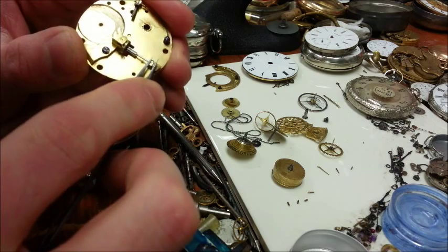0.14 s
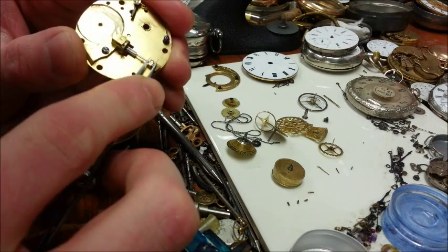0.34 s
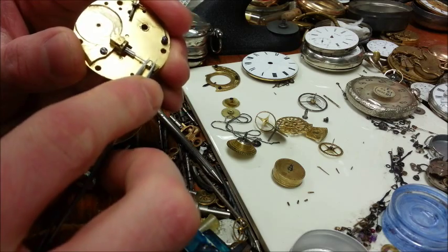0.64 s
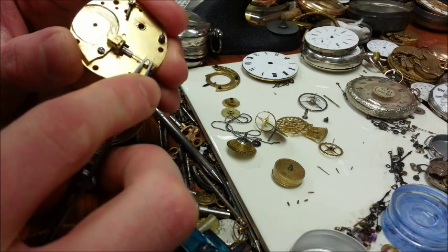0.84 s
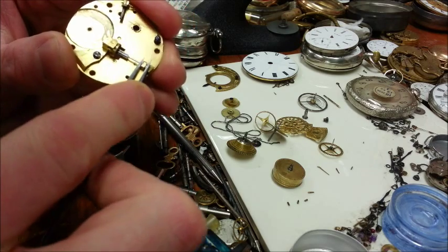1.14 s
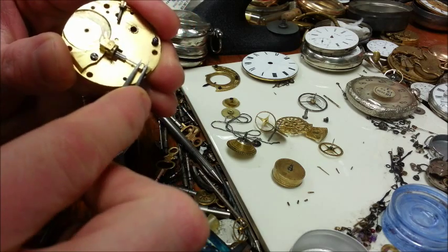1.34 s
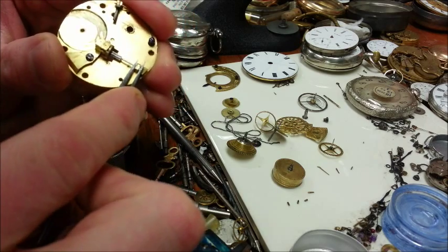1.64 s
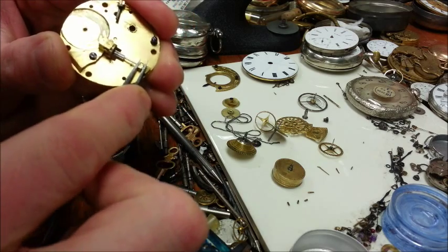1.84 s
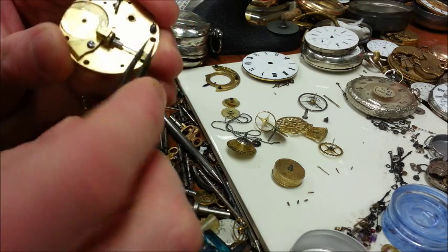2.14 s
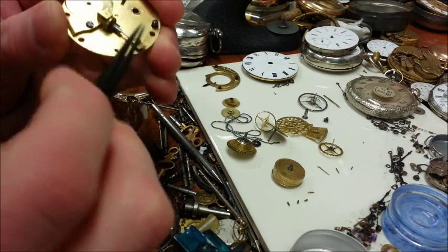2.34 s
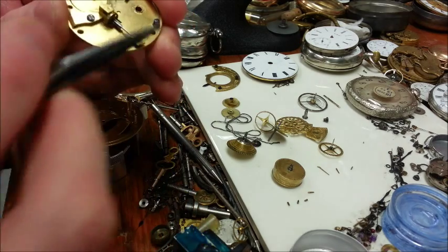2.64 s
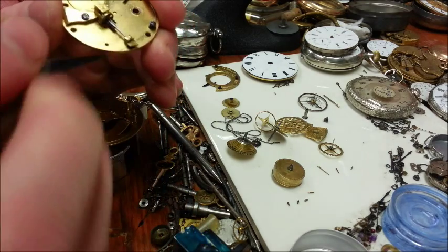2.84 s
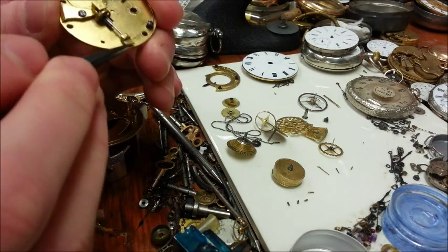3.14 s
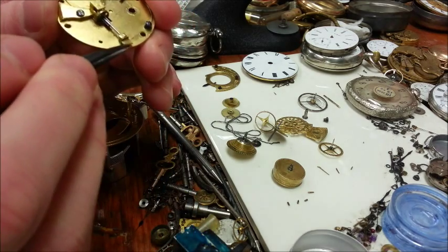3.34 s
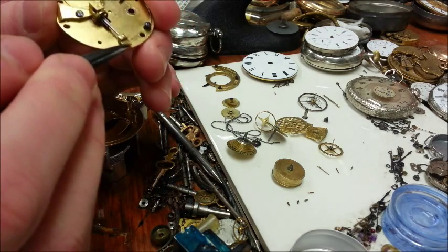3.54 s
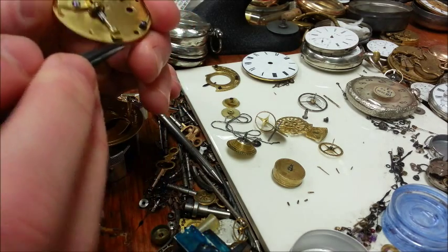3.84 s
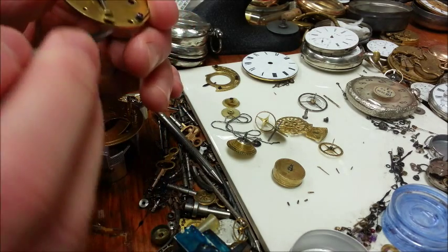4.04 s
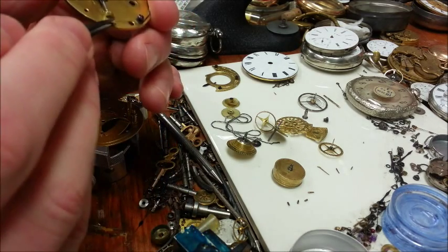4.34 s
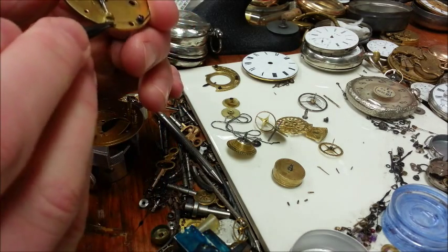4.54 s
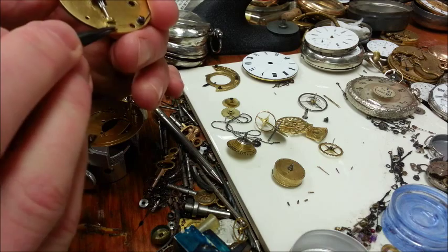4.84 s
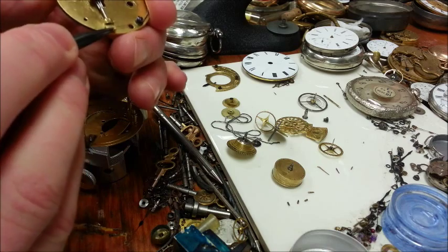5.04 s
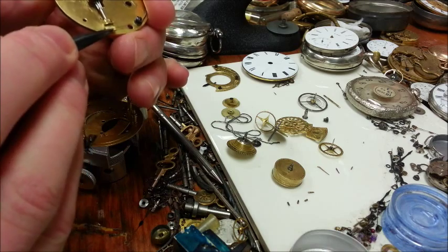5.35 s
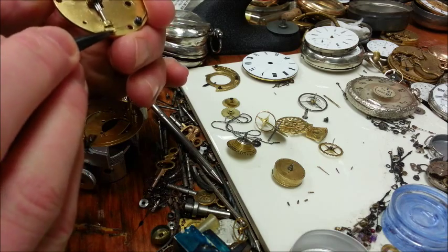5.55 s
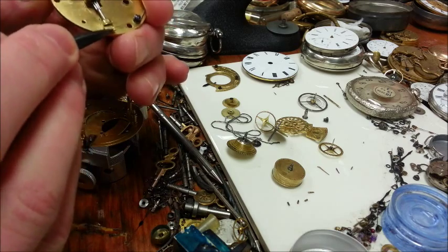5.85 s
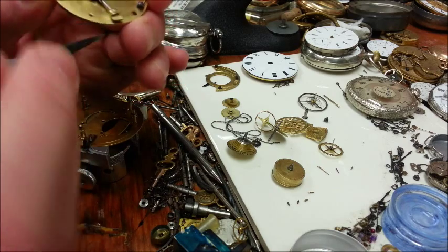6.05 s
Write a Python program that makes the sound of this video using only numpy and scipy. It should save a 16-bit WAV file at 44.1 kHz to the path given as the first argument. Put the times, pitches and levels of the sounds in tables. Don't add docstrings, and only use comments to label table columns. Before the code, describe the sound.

A quiet workbench in a small room, heard in close stereo with the handling mostly on the right. Throughout, ventilation rumbles low and slightly unsteady, a motor hums, a very thin high lamp whine and soft hiss sit beneath, and another watch ticks faintly five times a second, strong and weak beats alternating, one tick standing out near 2.2 s. At 0.47 s a dry double tap on brass with a soft rub. Around 2.15 s small springy nudges ring briefly, then skin brushes softly; bright pecks follow at 2.6 s and 2.86 s, more taps at 3.1 s. At 3.7 s a short gritty scrape catches and slips, with fainter scraping and a knock to 3.95 s. Taps and a hollow knock cluster at 4.1-4.45 s. After a pause, a loud, crisp, ringing snap cracks at 5.2 s, then a quieter, tighter snap at 6.06 s.

```python
import sys
import numpy as np
from scipy import signal
from scipy.fft import rfft, irfft
from scipy.io import wavfile
from scipy.ndimage import uniform_filter1d

SR = 44100
rng = np.random.default_rng(int(sys.argv[2]) if len(sys.argv) > 2 else 0)


def output_pcm(signal):
    pcm = np.clip(np.atleast_2d(signal).T, -1, 1) * 32767
    wavfile.write(sys.argv[1], SR, np.round(pcm).astype(np.int16))


def field_ratio(decibels):
    return 10 ** (np.asarray(decibels, dtype=float) / 20)


N = 272538


def on_log(table, hz):
    f, v = np.transpose(table)
    return np.interp(np.log(hz + 1), np.log(f + 1), v)


def walk(rate):
    size = int(SR / rate)
    x = uniform_filter1d(rng.standard_normal(N), size=size)
    x = uniform_filter1d(x, size=size)
    return x / x.std()


def contacts(rows, modes, grain_db=5, scatter_db=3, far_lag=10, least_shade=0.17, crack_db=-8,
             rise=0.35, blow=0, loose=1, stagger=.5, onset_s=0.000067):
    # pitch_hz, share [ratio]
    shade_table = [(1200, .45), (2600, .2), (3500, -.25), (4300, -.5), (5100, .5), (6100, .65), (7200, 2),
                   (10000, 1.3)]
    out = np.zeros((2, N + SR))
    t = np.arange(6144) / SR
    hz, mode_db, t60_s = np.transpose(modes)[:, :, None]
    bright = signal.butter(1, [1800, 13500], "band", fs=SR, output="sos")
    shade_hz = np.arange(len(t) + 1) * SR / len(t) / 2
    shade = np.maximum(on_log(shade_table, shade_hz), least_shade)
    for start_s, peak_db, contact_ms, pan_db, tilt_db in rows:
        impacts = rng.standard_normal(len(t)) * field_ratio(grain_db * rng.exponential(size=len(t)))
        u = t / (max(contact_ms, .05) / 1000)
        build = 1 - np.exp(-(u + 0.13) / abs(rise))
        impacts = impacts * build * np.exp(-.8 * u - u ** 6)
        impacts[0] += blow * np.linalg.norm(impacts)

        turn = loose * rng.random((2, len(hz), 1)) + np.arange(len(hz))[:, None] * stagger
        spread = rng.standard_normal((2, len(hz), 1))
        gain = field_ratio(mode_db + tilt_db * np.log2(hz / 6000) + scatter_db * spread)
        decay = np.exp(-np.log(1000) * t / t60_s)
        ring = np.sum(gain * decay * np.sin(2 * np.pi * (hz * t + turn)), axis=1)
        ring = ring * np.minimum(t / onset_s, 1)
        crack = signal.sosfilt(bright, 1. * (t == 0))
        sound = signal.fftconvolve(ring + field_ratio(crack_db) * crack, impacts[None], axes=1)[:, :len(t)]

        left = rfft(sound[0], 2 * len(t)) * field_ratio(pan_db * shade)
        sound[0] = irfft(left)[:len(t)]
        sound = sound * field_ratio(peak_db) * 2 / np.abs(sound).max(axis=1).sum()
        for side, lag in enumerate((far_lag, 0)):
            at = int(start_s * SR) + lag
            out[side, at:at + len(t)] += sound[side]
    return out[:, :N]


def snaps():
    # start_s, peak_db, contact_ms, left_minus_right_db, tilt_db_per_octave
    snap_rows = [
        (5.2155, -9, .3, -11.5, 0),
        (5.2162, -35, 14, -9, -4),
        (5.2428, -39, 1.5, -1, -6),
        (6.0638, -24, .4, -11, 0),
        (6.0745, -46, 3, -6, -9),
    ]
    # pitch_hz, level_db, t60_s
    plate = [(1270, -12, .009), (1990, -12, .012), (2830, -17, .010), (3150, -13, .016), (3800, -9, .008),
             (4750, -5, .009), (5180, 4, .014), (5990, -3, .010), (6800, 4, .008), (7790, 6.5, .014),
             (8500, -10, .011), (10950, -2, .009), (12090, -12, .009), (13610, -4.5, .009),
             (14420, -6.5, .008)]
    # pitch_hz, level_db, t60_s
    gripped = [(1190, -19, .012), (1900, -26, .008), (2600, -25, .010), (3300, -24, .010),
               (3900, -24, .008), (4720, -7, .010), (5020, -2.5, .015), (5990, -9, .009), (6460, -8, .009),
               (6950, -5, .009), (7530, 6, .022), (10010, -13, .008), (10600, -3, .011), (13420, -15, .008),
               (14330, 0, .013)]

    def snap(rows, modes):
        return contacts(rows, modes, grain_db=1.5, scatter_db=.4, least_shade=-.5, crack_db=-4,
                        blow=12, loose=.03, stagger=.32, onset_s=.0004)

    return snap(snap_rows[:3], plate) + snap(snap_rows[3:], gripped)


def knocks():
    # start_s, peak_db, contact_ms, left_minus_right_db, tilt_db_per_octave
    knock_rows = [(3.8825, -51, 3, -5, -2), (4.412, -58, 8, 1, 4), (4.4221, -32.5, 1.2, -12, 3),
                  (4.4397, -40.5, 1.5, -6, -5), (4.4432, -45, 1.5, -12, 6), (4.453, -53, 4, -3, -5)]
    # pitch_hz, level_db, t60_s
    case = [(1450, -9, .007), (2050, -1.5, .011), (2400, -10, .008), (4240, -14, .007), (5600, -3, .006),
            (6080, 1, .008), (7900, -12, .005), (8800, -17, .005), (11100, -24, .004)]
    # start_s, peak_db, contact_ms, left_minus_right_db, tilt_db_per_octave
    peck_rows = [(2.5992, -31.5, 0.48, -16, -2.5), (2.6048, -41, 1, -9, 4), (2.6575, -41, 0.99, -11, 3),
                 (2.856, -44, 0.65, -11, 1.5), (3.1205, -39, 1.5, -21, 6)]
    # pitch_hz, level_db, t60_s
    rim = [(1400, -4, .005), (2500, -1, .006), (3300, 0, .005), (4200, 0, .006), (6800, 1, .008),
           (8200, -6, .005), (11000, -5, .004), (13300, -4, .004)]
    on_case = contacts(knock_rows, case, grain_db=2, scatter_db=1, far_lag=3, crack_db=-5, blow=2.5, loose=.1)
    on_rim = contacts(peck_rows, rim, grain_db=2, scatter_db=1, far_lag=3, crack_db=6, blow=4, loose=.1)
    return on_case + on_rim


def taps():
    # start_s, peak_db, contact_ms, left_minus_right_db, tilt_db_per_octave
    tap_rows = [(.467, -38, 2.6, -9, -4), (.4693, -32.5, 5.9, -9.5, 3), (.478, -53, 19, -3, -2),
                (.625, -54, 3, -3, 2), (2.175, -57, 4.8, -1, 0), (2.659, -45, 21, -13, -6),
                (3.112, -46, 3.5, -5, -3), (3.1395, -45.5, 2, -11, -2), (3.144, -52, 2.3, -11, 0.19),
                (3.185, -55, 2, -3, 2), (4.1295, -50, 3.1, -6, -6), (4.3565, -43.5, 5.3, -9, 2)]
    # pitch_hz, level_db, t60_s
    bridge = [(1500, -15, .005), (3000, -16, .005), (4400, -9, .006), (5300, -6, .006), (6200, -3, .006),
              (7200, -6, .007), (7800, -1, .007), (8500, -4, .007), (9600, -7, .006), (10800, -4, .007),
              (12000, -8, .006), (13400, -9, .007)]
    # start_s, peak_db, contact_ms, left_minus_right_db, tilt_db_per_octave
    nudge_rows = [
        (2.1512, -36, 1.2, -9, 3),
        (2.1660, -39, 3.5, -8, -1),
        (2.1685, -41, 3, -8, -2),
    ]
    # pitch_hz, level_db, t60_s
    spring = [(2840, -5, 0.017), (4280, -4, 0.012), (6080, 0, 0.023), (7260, 0, 0.016), (8900, -5, 0.0091),
              (10300, -17, 0.0053), (11700, -4, 0.0071), (13700, -8, 0.0082)]
    on_bridge = contacts(tap_rows, bridge, grain_db=-1.0, scatter_db=-1.0, crack_db=10, rise=0.12, loose=.3)
    on_spring = contacts(nudge_rows, spring, grain_db=1, scatter_db=1.5, crack_db=3, blow=1.5, loose=.2)
    return on_bridge + on_spring


def scrapes():
    # start_s, peak_db, contact_ms, left_minus_right_db, tilt_db_per_octave
    scrape_rows = [(3.679, -38.5, 9, -15, 1), (3.686, -35, 7.5, -7, 3), (3.696, -62, 13, -3, 0),
                   (3.708, -50, 7.7, -3, 8), (3.7148, -37.5, 14, -17, 3), (3.7287, -35.5, 5.2, -13, 0),
                   (3.7295, -49, 1.3, -1, -20), (3.870, -57, 8.9, -6, -2), (3.881, -52.5, 11, -7, -5),
                   (3.942, -52.5, 17, -8, -3), (3.9562, -49, 13, -3, -8)]
    # pitch_hz, level_db, t60_s
    tines = [(4270, -3.5, 0.034), (5150, -7.5, 0.007), (6860, 8, 0.014), (7400, -9, 0.012),
             (8040, -5, 0.0082), (8600, -13, 0.0052), (10350, -1, 0.011), (10860, -1.5, 0.0076),
             (12600, -8, 0.008), (13800, -8, .008)]
    return contacts(scrape_rows, tines, grain_db=3.5, scatter_db=3.5, crack_db=4, rise=0.11)


def rubs():
    # start_s, peak_db, contact_ms, left_minus_right_db, tilt_db_per_octave
    rub_rows = [(.466, -41, 12, 3, -4), (.476, -46, 22, -1, -5), (2.128, -53, 59, -1, 7),
                (2.178, -53.5, 51, -5, -6), (2.601, -41.5, 31, -1, -10), (2.632, -43.5, 45, -11, -4),
                (2.644, -47, 50, -1, -2), (2.70, -55, 120, -5, 4), (2.86, -48.5, 40, -2, 5),
                (3.113, -47.5, 55, 1, -5), (3.26, -56, 30, -3, 6), (3.655, -50.5, 79, -1, -8),
                (3.678, -45.5, 96, -1, -3), (4.36, -49, 39, -2, 3), (4.413, -39, 60, -3, -8.5),
                (5.219, -37, 26, -2, -1), (6.057, -50, 9, -7, 4), (6.066, -43, 20, -1, -3),
                (2.385, -55.5, 92, -3, -8), (2.49, -54.5, 140, -7, -5)]
    # pitch_hz, level_db, t60_s
    skin = [(1500, -11, .003), (2400, -9, .0025), (3900, -6, .002), (6500, -3, .002), (7600, -1, .002),
            (10000, -5, .002), (13000, -9, .002)]
    return contacts(rub_rows, skin, far_lag=6, grain_db=-1.35, scatter_db=1.5, crack_db=12, rise=0.25)


def ticking_watch():
    beats_db = [-57, -44.5, -51, -46.5, -53, -47.5, -54, -43.5, -56, -47, -35, -45, -49, -49, -57, -48, -47,
                -46.5, -53, -46, -50, -46, -51, -46.5, -52, -51.5, -54, -50.5, -54, -50.5]
    # pitch_hz, level_db, t60_s
    pallet = [(4400, -15, .005), (5700, -7, .006), (6600, -5, .007), (7400, -5, .006), (8270, -4, .008),
              (8750, -6, .007), (10200, -4, .005), (11700, -4, .006), (13000, -6, .005), (14200, -8, .005)]
    first_beat_s, beat_s = .167, .20012
    drops = [(first_beat_s + k * beat_s, db + 2.0, 3.5, -2, 0) for k, db in enumerate(beats_db)]
    unlocks = [(s - .009, db - 11, 8, -2, 0) for s, db, *_ in drops]
    return contacts(drops + unlocks, pallet, far_lag=7, grain_db=2.0, scatter_db=1.5, crack_db=5,
                    rise=0.055, blow=1.2, loose=.3)


def bench_echo(x):
    t60_s, level_db = .11, -21
    t = np.arange(SR // 4) / SR
    fade = np.exp(-np.log(1000) * t / t60_s) * np.minimum(t / .005, 1)
    echo = rng.standard_normal((2, len(t))) * fade
    echo = echo / np.sqrt(np.sum(echo ** 2, axis=1, keepdims=True))
    spilled = x + .35 * x[::-1]
    return field_ratio(level_db) * signal.fftconvolve(spilled, echo, axes=1)[:, :N]


def air():
    # pitch_hz, level_db
    tone_db = [(25, -29), (40, -15), (52, -10.5), (96, -11), (144, -5.5), (183, -15.5), (240, -6.5),
               (340, -8.5), (600, -16), (1000, -26.5), (2000, -36), (4000, -42.5), (8600, -45),
               (14600, -48)]
    # pitch_hz, width_hz, lift_db
    room_modes = [(73.3, 3.4, 14), (103.8, 13, 9), (132, 5.3, -6), (133, 27, 3.5), (171.3, 9.2, 6.5),
                  (216, 7.8, 6.5), (244.5, 8.9, 5.5), (342.5, 5.2, 7.5)]
    # pitch_hz, likeness [0-1]
    likeness = [(60, 1), (130, 0.84), (290, 0.94), (640, 0.32), (1410, 0), (3100, 0.02), (6820, 0.07),
                (15000, 0)]
    # pitch_hz, left_minus_right_db
    lean_db = [(60, 0.5), (200, 0.3), (500, 1), (1290, 1.5), (4400, 2.5), (8120, -2.5), (15000, 2.5)]
    # start_s, rumble_level_db
    gusts = [(0, -45.5), (.6, -44), (1.2, -46), (1.6, -44.5), (2.0, -45.5), (2.5, -45), (2.95, -46.5),
             (3.3, -44), (3.7, -44.5), (4.3, -45), (4.8, -44.5), (5.2, -45), (5.7, -44.5), (6.18, -45.5)]
    air_db, rumble_top_hz = -44.5, 1300
    hz = np.arange(N // 2 + 1) * SR / N
    lift = 1 + sum((field_ratio(db) ** 2 - 1) / (1 + (2 * (hz - f) / w) ** 2) for f, w, db in room_modes)
    alike = np.clip(on_log(likeness, hz), 0, .995)
    mid, side = rfft(rng.standard_normal((2, N)), axis=1)
    sign = np.array([[1], [-1]])
    pair = mid * np.sqrt(1 + alike) + sign * side * np.sqrt(1 - alike)
    pair = pair * field_ratio(on_log(tone_db, hz) + sign * on_log(lean_db, hz) / 2) * np.sqrt(lift)
    low = 1 / (1 + (hz / rumble_top_hz) ** 4)
    rumble = irfft(pair * low, N, axis=1)
    hiss = irfft(pair * (1 - low), N, axis=1)
    gust_db = np.interp(np.arange(N) / SR, *np.transpose(gusts))
    swell_db = gust_db - gust_db.mean() + .8 * walk(12)
    return (rumble * field_ratio(swell_db) + hiss) * field_ratio(air_db) / rumble.std()


def motor_hum():
    # pitch_hz, level_db, waver_db
    motor_lines = [(56, -53.5, .8), (119, -56, 1.5)]
    hum = np.zeros(N)
    for pitch_hz, level_db, waver_db in motor_lines:
        level = field_ratio(level_db + waver_db * walk(4))
        hum += level * np.sin(2 * np.pi * np.cumsum(pitch_hz + .3 * walk(3)) / SR)
    fan_hz, fan_db, swell_db, swells_per_s = 141.7, -56, 4.5, 7
    fan_level = field_ratio(fan_db + swell_db * walk(swells_per_s))
    fan = fan_level * np.sin(2 * np.pi * np.cumsum(fan_hz + .5 * walk(3.5)) / SR)
    return np.sqrt(2) * (hum + fan)


def lamp_whine():
    # start_s, pitch_hz
    whine_pitch = [(0, 8885), (1.95, 8800), (2.15, 8865), (3.7, 8765), (3.85, 8810), (6.18, 8745)]
    hz = np.interp(np.arange(N) / SR, *np.transpose(whine_pitch)) + 6 * walk(20)
    phase = 2 * np.pi * np.cumsum(hz) / SR
    level = field_ratio(-83.5 + 1.5 * walk(12))
    whine = level * np.sin(phase + np.array([[1.5], [0]])) * field_ratio(np.array([[-3], [3]]))
    return np.sqrt(2) * whine


def scene():
    close = snaps() + knocks() + taps() + scrapes() + rubs()
    ticks = ticking_watch()
    echoes = bench_echo(close + field_ratio(10) * ticks)
    return close + ticks + echoes + air() + motor_hum() + lamp_whine()


def low_pass(x):
    return signal.sosfilt(signal.butter(12, 15770, fs=SR, output="sos"), x)


def record(dry):
    steep = signal.ellip(8, .3, 40, 14620, fs=SR, output="sos")
    cut = signal.sosfilt(steep, dry)
    return low_pass(cut)


dry = scene()
out = record(dry)
output_pcm(out)
```